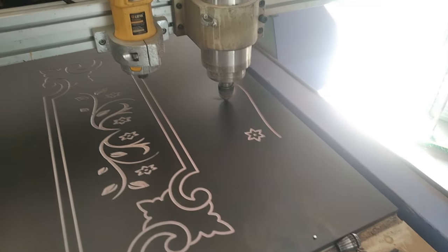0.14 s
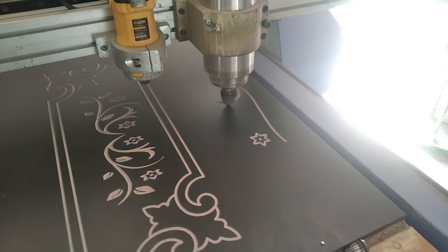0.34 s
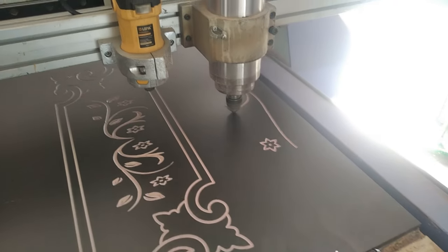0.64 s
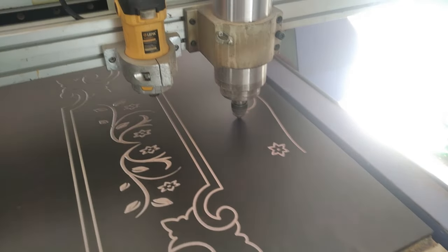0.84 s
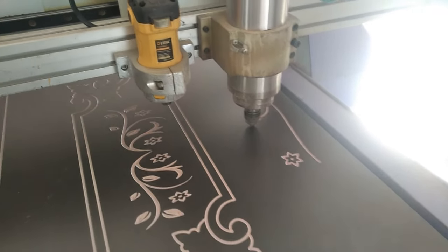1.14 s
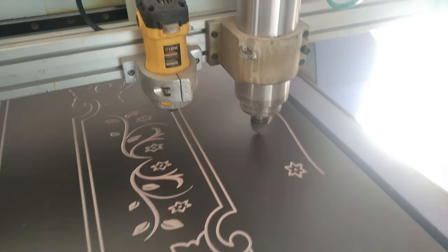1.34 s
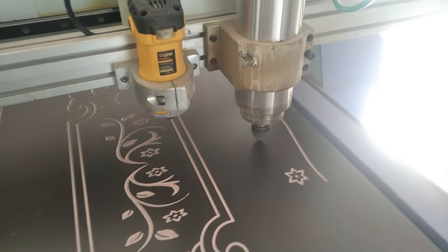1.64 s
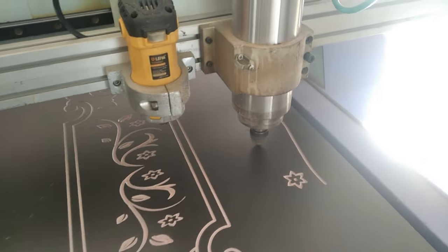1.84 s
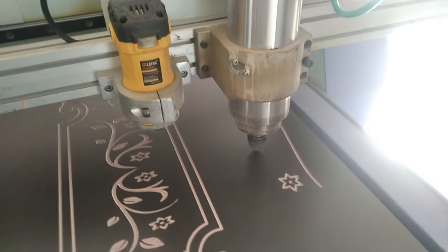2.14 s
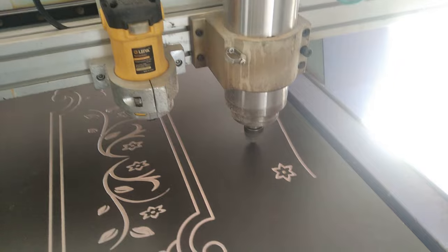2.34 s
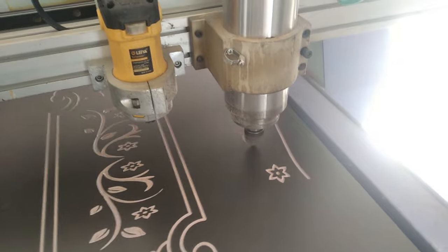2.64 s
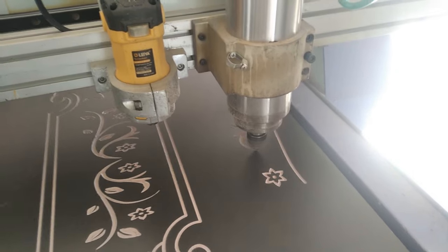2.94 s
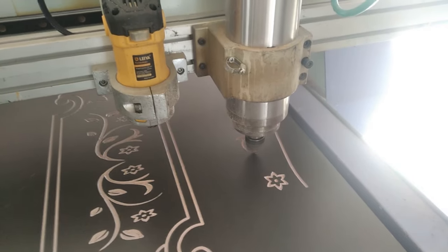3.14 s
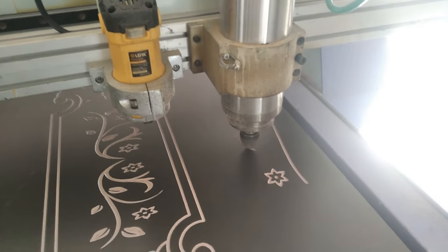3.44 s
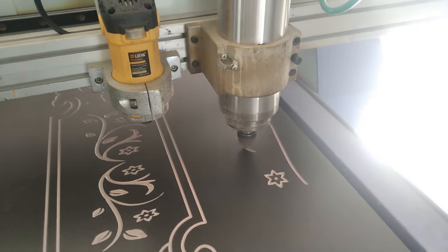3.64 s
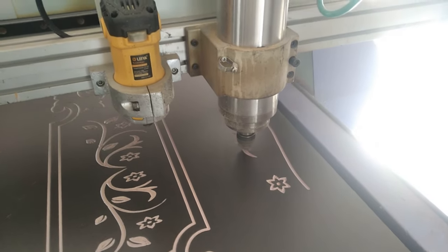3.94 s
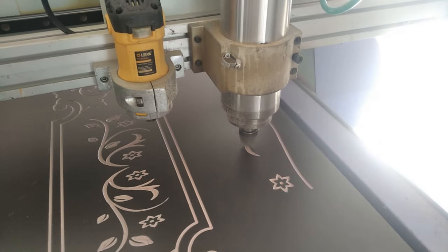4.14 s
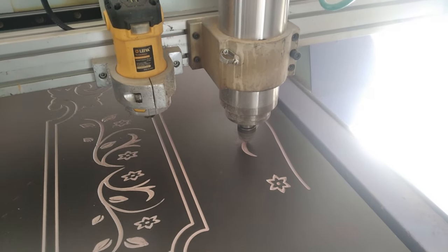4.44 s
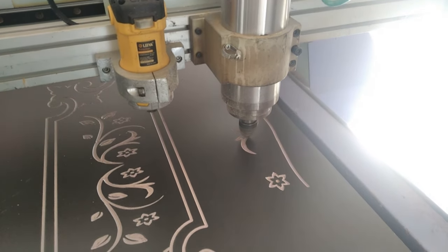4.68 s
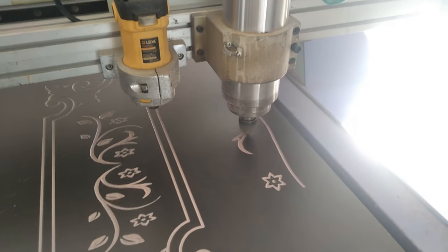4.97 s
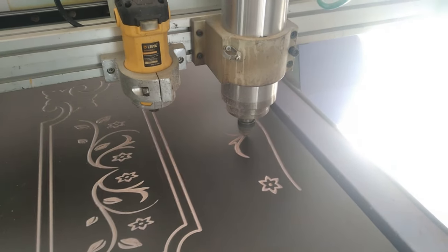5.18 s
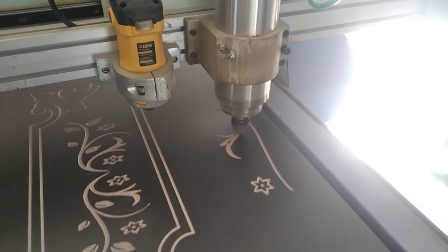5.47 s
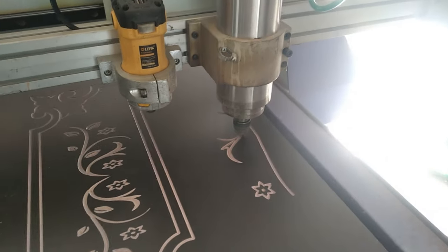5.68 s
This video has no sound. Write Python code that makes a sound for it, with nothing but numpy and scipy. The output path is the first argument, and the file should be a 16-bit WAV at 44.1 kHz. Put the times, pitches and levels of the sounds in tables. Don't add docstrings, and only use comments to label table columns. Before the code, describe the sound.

Close, steady buzzing whine of a router cutting wood, its harmonics and gritty hiss shifting, over faint motor hums and workshop rumble.

```python
import sys
import numpy as np
from scipy import signal
from scipy.fft import rfft, irfft, next_fast_len
from scipy.io import wavfile
from scipy.ndimage import uniform_filter1d

SR = 44100
rng = np.random.default_rng(int(sys.argv[2]) if len(sys.argv) > 2 else 0)


def to_wav(s):
    ch = np.atleast_2d(s).T
    pcm = np.round(np.clip(ch, -1, 1) * 32767)
    wavfile.write(sys.argv[1], SR, pcm.astype(np.int16))


def voltage_ratio(level):
    return 10 ** (np.asarray(level, float) / 20)


N = 256219
SHAFT_HZ = 399.0
STEP = 32

# t/s, depth as chip hiss level/dB, grip as edge orders over the hiss/dB
CUT_DEPTH = [(0.0, -29.5, 12), (.19, -30, 11.5), (.25, -29, 4), (.45, -27.5, 0.5), (1.29, -27, -4.5),
             (1.37, -33.5, 1.1), (1.43, -26, 7.5), (1.56, -27.5, -2.5), (2.1, -27.5, 3.5),
             (2.85, -27.5, -4.5), (3.06, -33.5, -3.5), (3.25, -40.5, -7.5), (3.4, -37, -12),
             (3.5, -33, -4.5), (3.75, -26.5, 3.5), (3.95, -30, -2), (4.7, -27.5, -4), (5.81, -28.5, 0.2)]
# f/Hz, left minus right/dB
STEREO_LEAN = [(60, 5), (110, 3.5), (200, 2.5), (370, -1.5), (680, 2.5), (1240, 4), (2280, 1), (4170, -6),
               (7650, -3.5), (14000, 19.5)]


def curves(table):
    s, *columns = np.transpose(table)
    return [np.interp(np.arange(N) / SR, s, column) for column in columns]


def slew(rate, count=1):
    hold = max(int(SR / STEP / rate), 2)
    held = np.repeat(rng.standard_normal((count, N // STEP // hold + 2)), hold, axis=1)
    slewed = uniform_filter1d(uniform_filter1d(held, hold, axis=1), hold, axis=1)
    return slewed[:, :N // STEP + 2] / slewed.std()


def fill(rows):
    return np.array([np.interp(np.arange(N), STEP * np.arange(len(row)), row) for row in rows])


def walk(rate, count=1):
    return fill(slew(rate, count=count))


def read(table, hz):
    f, value = np.transpose(table)
    return np.interp(np.log(hz), np.log(f), value)


def pan(db):
    return voltage_ratio(np.array([db, -db]) / 2)


def node_db(k):
    # t/s, spread/s, order f/Hz, change/dB
    order_nodes = [(.4, .03, 399, 3), (1.39, 0.016, 399, -13), (1.455, .03, 399, -18), (.3, 0.021, 798, -16),
                   (.37, 0.014, 798, -13), (.33, 0.062, 798, -7.5), (1.33, 0.024, 798, -17),
                   (1.37, 0.016, 798, -6), (1.47, 0.046, 798, 3.5), (1.795, 0.039, 798, -17),
                   (1.86, 0.053, 798, -7), (2.2, 0.14, 798, -11.5), (5.34, .08, 798, -1.5),
                   (.1, .12, 1197, 2), (.45, 0.15, 1197, -6), (1.4, 0.053, 1197, -10),
                  (1.67, 0.11, 1197, 6.5), (1.89, 0.037, 1197, -16), (2.08, 0.18, 1197, -11.5),
                  (2.75, 0.21, 1197, 7), (3.3, .12, 1197, -7), (3.9, 0.087, 1197, 6.5),
                  (4.1, 0.069, 1197, -11), (4.63, .04, 1197, -10), (4.8, 0.32, 1197, 5),
                  (5.37, .05, 1197, -5), (5.65, 0.06, 1197, -8), (.1, .15, 1596, -6),
                  (.4, 0.015, 1596, -15), (1.37, .04, 1596, -7), (1.46, 0.028, 1596, -16),
                  (1.59, 0.042, 1596, -17), (1.84, 0.045, 1596, -11), (2.14, 0.2, 1596, -11),
                  (3.0, 0.44, 1596, -3.5), (3.87, .03, 1596, -9), (4.45, 0.44, 1596, 3),
                  (5.52, 0.12, 1596, -8)]
    port_gap_s = 0.0048
    t = np.arange(N) / SR + port_gap_s * np.array([[.5], [-.5]])
    change = 0
    for s, spread, hz, db in order_nodes:
        if round(hz / SHAFT_HZ) == k:
            change = change + db * np.exp(-((t - s) / spread) ** 2)
    return change


def order(k, turn, db, pan_db, wobble, lag):
    drift = lag * walk(1.163)[0] * np.array([[.5], [-.5]])
    tremble = 1 + wobble * walk(60., count=2)
    tone = np.sin(k * turn + drift + rng.uniform(0, 2 * np.pi))
    return np.sqrt(2) * voltage_ratio(db) * pan(pan_db) * tremble * tone


def panel_drum(turn, pan_db):
    # t/s, order 1 level/dB, order 2 level/dB
    drum_levels = [(0.0, -24, -15), (.21, -23, -15), (.28, -17, -15), (.86, -20, -15.5), (1.28, -21, -20.5),
                   (1.68, -19.5, -13), (1.85, -20.5, -20), (2.45, -20, -23), (2.86, -22, -14),
                   (3.2, -28, -27), (3.47, -30, -28), (3.65, -25, -28.5), (4.05, -25, -21.5),
                   (4.42, -27.5, -23.5), (4.8, -20.5, -14), (5.08, -21.5, -13), (5.5, -20, -13.5),
                   (5.81, -21.5, -18.5)]
    first_db, second_db = curves(drum_levels)
    first = order(1, turn, first_db + node_db(1), pan_db, 0.016, 0.59)
    second = order(2, turn, second_db + node_db(2), pan_db, 0.038, 0.38)
    return first + second


def bite(turn, chip_db, upper_db, pan_db):
    third = order(3.002, turn, upper_db - 0.6 + node_db(3), pan_db / 3, 0.09, 0.55)
    fourth = order(4, turn, chip_db - 3 + node_db(4), pan_db / 3, 0.08, 0.45)
    return third + fourth


def spot_db(k):
    panel_spots = [(-.08, 0.73, 3591, 10), (-.08, 0.25, 3990, -9), (0.58, 0.69, 3990, 10),
                   (1.05, 0.26, 5187, 11.5), (1.3, 0.34, 3591, -9), (1.37, 0.33, 3192, -6),
                   (1.66, 0.21, 1995, 8.5), (1.68, 0.22, 3591, -13), (1.81, 0.3, 1995, -12),
                   (2.11, 0.61, 2394, 9.5), (2.12, 0.4, 1995, -8), (2.81, 0.24, 2394, 11.5),
                   (3.04, 0.21, 1995, 7), (3.08, 0.72, 2394, 12), (3.44, 0.53, 3591, -8),
                   (3.55, 0.3, 7182, 14), (3.52, 0.27, 3192, 9), (3.48, 0.27, 5187, 12),
                   (3.62, 0.27, 2793, -6), (3.69, 0.25, 5586, -8), (3.7, 0.3, 1995, 7),
                   (4.13, 0.22, 4389, 11), (4.22, 0.35, 7182, 10), (4.31, 0.18, 1995, -11),
                   (4.33, 0.42, 3591, 9), (4.41, 0.55, 2394, 8.5), (4.72, 0.34, 7182, 5),
                   (4.73, 0.35, 2793, 6.5), (5.1, 0.36, 2793, 4.5), (5.35, 0.24, 3591, 7),
                   (-.08, .6, 4788, 4.4),
        (-.08, .6, 5187, 6),
        (-.08, 0.36, 5985, 7),
        (1.3, 1.25, 3990, 2.7),
        (3.9, 1.4, 3192, 5.4),
        (4.55, 0.77, 1995, 5.6),
    ]
    t, out = np.arange(N) / SR, np.zeros(N)
    for s, length, hz, db in panel_spots:
        if round(hz / SHAFT_HZ) == k:
            out += db * np.clip(np.minimum(t - s + 0.042, s + length - t) / 0.099, 0, 1)
    return out


def upper_orders(turn, low_db, high_db, fade=0.2, flutter=0.45, rough=0.42):
    order_levels = [(1, -4), (2, 0), (3, -11), (4, -15), (5, -14), (6, -21.5), (7, -15), (8, -13.5),
                    (9, -16.5), (10, -17.5), (11, -18.5), (12, -18), (13, -19.5), (14, -27), (15, -23.5),
                    (16, -22), (17, -25.5), (18, -27.5), (19, -26), (20, -30.5), (21, -30.5)]
    upper = order_levels[4:]
    out, total = 0, np.sqrt(np.sum(voltage_ratio(2 * np.transpose(upper)[1])))
    for k, db in upper:
        slow, quick, grain = slew(4.0, count=4), slew(35., count=4), slew(140., count=4)
        spot = spot_db(k)
        firm = voltage_ratio(-.4 * np.clip(spot + low_db - high_db, -3, 20))
        smear = (k / 10) ** 1.3 * (flutter * quick + rough * grain)
        wander = firm * fill(fade * slow + smear)
        phase = rng.uniform(0, 2 * np.pi) + .5j * rng.standard_normal((2, 1))
        paths = np.exp(1j * rng.uniform(0, 2 * np.pi) * 0 + 1j * phase.real + phase.imag * 1j)
        paths = paths + wander[:2] + 1j * wander[2:]
        share = np.clip((k - 14) / 5, 0, 1)
        level = voltage_ratio(db + spot + (1 - share) * low_db + share * high_db) / total
        lean = pan(read(STEREO_LEAN, k * SHAFT_HZ)).reshape(2, 1)
        out = out + level * lean * np.imag(paths * np.exp(1j * k * turn))
    return out


def hiss(shape, gate, flicker_db, flicker_rate, repeat=0):
    # f/Hz, likeness of left and right (0-1)
    port_likeness = [(60, 0.92), (300, .85), (1000, 0.47), (3000, 0), (7000, 0.25), (14000, 0)]
    # f/Hz, width/Hz, change/dB
    noise_hollows = [
        (560, 60, -4),
        (980, 70, -7),
        (1800, 90, -10),
        (3420, 100, -9),
        (3790, 90, -6),
    ]
    size = next_fast_len(N)
    hz = np.maximum(np.arange(size // 2 + 1) * SR / size, 1)
    like = np.clip(read(port_likeness, hz), 0, 1)
    mid, side = rfft(gate * rng.standard_normal((2, N)), size)
    pair = np.sqrt(1 + like) * mid + np.sqrt(1 - like) * side * np.array([[1], [-1]])
    pair = pair * voltage_ratio(read(shape, hz)) * pan(read(STEREO_LEAN, hz))
    repeat = repeat / (1 + (hz / 7500) ** 4)
    pair = pair / (1 - repeat * np.exp(-2j * np.pi * hz / SHAFT_HZ))
    pair = pair * voltage_ratio(sum(db * np.exp(-((hz - f) / width) ** 2) for f, width, db in noise_hollows))
    place = 2 * np.log2(hz / shape[0][0])
    count = int(2 * np.log2(shape[-1][0] / shape[0][0])) + 2
    flicker = voltage_ratio(flicker_db * walk(flicker_rate, count=count))
    out = 0
    for k in range(count):
        band = np.clip(1 - abs(place - k), 0, 1)
        out = out + flicker[k] * irfft(pair * band, size)[:, :N]
    return out / np.sqrt(np.mean(out.mean(axis=0) ** 2))


def chip_hiss(turn, chip_db, pan_db):
    # f/Hz, level/dB per Hz
    chip_spectrum = [(450, -15), (900, -10.5), (1800, -12.5), (2600, -8.5), (3400, -7.5), (4300, -8),
                     (5500, -3.5), (6500, -2.5), (8000, -8.5), (9500, -7), (10700, -13.5), (12000, -16.5),
                     (14200, -24.5)]
    puff = 1 + .3 * np.cos(turn)
    chips = hiss(chip_spectrum, puff, 1.76, 11., repeat=0.55)
    chips = voltage_ratio(chip_db - 0.23) * pan(0.9 * pan_db) * chips
    treble = signal.sosfilt(signal.butter(2, 8500, "high", fs=SR, output="sos"), chips)
    treble_db = .25 * (chip_db + 28) + 1.2 * walk(7.)[0]
    return chips + (voltage_ratio(treble_db) - 1) * treble


def spindle():
    # t/s, orders 1 and 2 left minus right/dB, turn for the higher sounds left minus
    # right/dB
    hand_turns = [
        (0, 2, -2.5),
        (.9, 7, 0.5),
        (1.4, 2.5, -2.2),
        (1.9, 2, 2.5),
        (3.1, -2.5, 5),
        (3.6, 2.1, 3.5),
        (4.3, 9, 8.5),
        (4.7, 3, 5),
        (5.81, -3, 1.5),
    ]
    chip_db, grip_db = curves(CUT_DEPTH)
    drum_pan, high_pan = curves(hand_turns)
    upper_db = chip_db + grip_db
    pan_db = 3 + 0.21 * high_pan
    turn = 2 * np.pi * np.cumsum(SHAFT_HZ + 0.2496 * walk(2.5)[0]) / SR
    tones = panel_drum(turn, drum_pan) + bite(turn, chip_db, upper_db, pan_db)
    whine = pan(1.7 * pan_db) * upper_orders(turn, upper_db - .5, chip_db + 2.5)
    wood_grain = voltage_ratio(.9 * walk(18.)[0])
    return tones + (whine + chip_hiss(turn, chip_db, pan_db)) * wood_grain


def workshop():
    # f/Hz, level/dB per Hz
    air_spectrum = [(20, -39), (60, -22), (95, -29), (115, -16), (200, -17.5), (340, -16.5), (520, -18.5),
                    (720, -17), (1000, -22), (1600, -20), (3300, -19), (5000, -23.5), (8000, -24),
                    (14200, -37)]
    # t/s, change/dB
    gantry_load = [
        (0, -1),
        (.6, 3),
        (2.5, -1.5),
        (2.85, 0.5),
        (3.8, 1.9),
        (4.2, -6),
        (4.7, -0.3),
        (5.81, -1.5),
    ]
    air = voltage_ratio(-36.5) * hiss(air_spectrum, 1, 1.74, 3.1)
    bass = signal.sosfiltfilt(signal.butter(3, 330, fs=SR, output="sos"), air)
    return air + (voltage_ratio(curves(gantry_load)[0]) - 1) * bass


def bearings():
    # f/Hz, width/Hz, level/dB, loudest t/s, spread/s
    whistles = [
        (7900, 110, -43.5, 4.6, 1.2),
        (8900, 70, -48, .9, 1.0),
        (10170, 110, -44, 4.55, .7),
        (10870, 50, -51, .6, .6),
    ]
    t, out = np.arange(N) / SR, 0
    for hz, width, db, s, spread in whistles:
        sway = walk(2.5 * width, count=2)
        swell_db = -9.2 * np.tanh(((t - s) / spread) ** 2)
        level = voltage_ratio(db + 1.2 * walk(2.78)[0] + swell_db)
        out = out + level * np.imag((sway[0] + 1j * sway[1]) * np.exp(2j * np.pi * hz * t))
    load = voltage_ratio(0.57 * (curves(CUT_DEPTH)[0] + 32.0))
    return out * load * pan(np.array([16.0]))


def axes():
    motor_notes = [(0.599, 0.31, 118, 121, -46), (1.15, 0.18, 200, 204, -46.5), (1.3, .3, 112, 112.5, -44),
                   (1.901, 0.17, 200, 195, -41.5), (1.92, 0.29, 285, 299, -44),
                   (2.281, 0.21, 348, 346, -46), (2.75, 0.24, 290, 281.6, -44.5),
                   (3.15, 0.26, 215, 203, -42.5), (3.45, 0.21, 210, 217.8, -38),
                   (3.55, 0.28, 245.5, 320, -45), (3.95, 0.59, 348, 345, -43.5),
                   (4.421, .24, 345, 274, -44.5), (4.679, 0.35, 110, 124.4, -43),
                   (5.179, 0.35, 215, 194.6, -39.5), (5.599, 0.28, 195, 215, -40.5)]
    out, rough = np.zeros(N), 1 + 0.32 * walk(22.)[0]
    for s, length, hz0, hz1, db in motor_notes:
        i = np.arange(int(s * SR), min(int((s + length) * SR), N))
        phase = 2 * np.pi * np.cumsum(np.linspace(hz0, hz1, len(i))) / SR
        swell = np.sin(np.linspace(0, np.pi, len(i))) ** 0.36
        out[i] += voltage_ratio(db) * swell * np.sin(phase)
    return out * rough * pan(np.array([3.0]))


def scene():
    return spindle() + workshop() + bearings() + axes()


def top_cut(x):
    return signal.sosfilt(signal.butter(12, 14460, fs=SR, output="sos"), x)


def record(dry):
    steep = signal.ellip(12, .2, 80, 14250, fs=SR, output="sos")
    return top_cut(signal.sosfilt(steep, dry))


dry = scene()
out = record(dry)
to_wav(out)
```